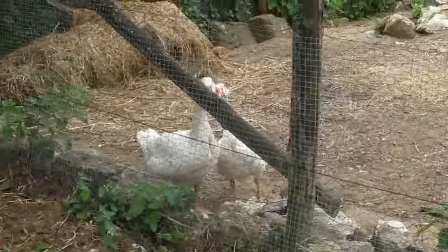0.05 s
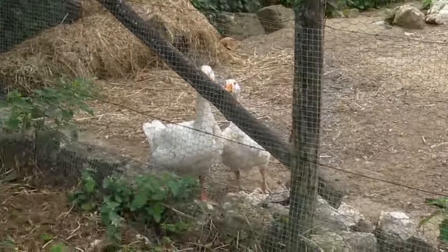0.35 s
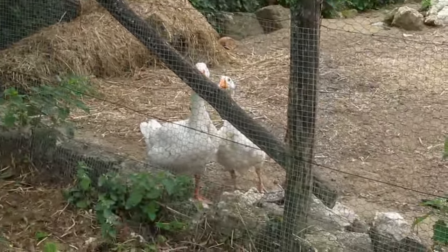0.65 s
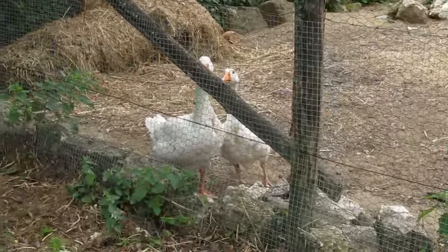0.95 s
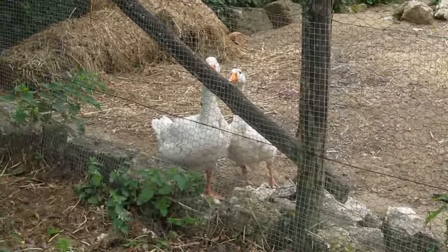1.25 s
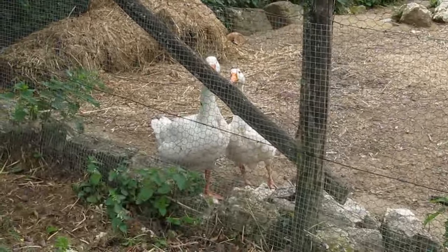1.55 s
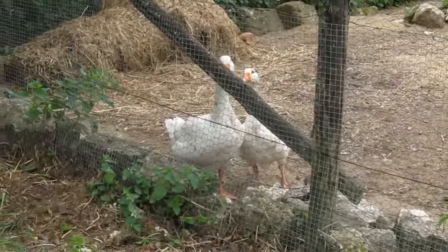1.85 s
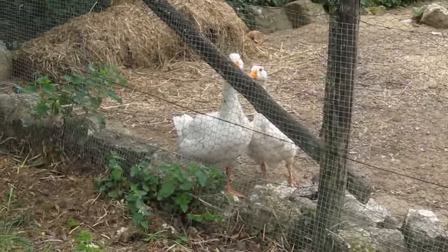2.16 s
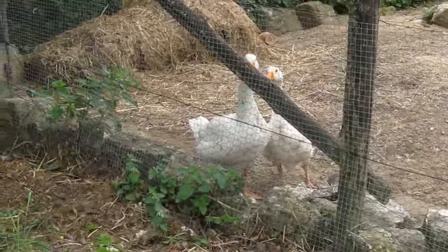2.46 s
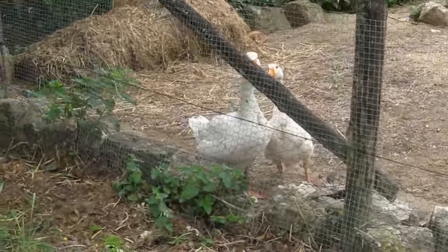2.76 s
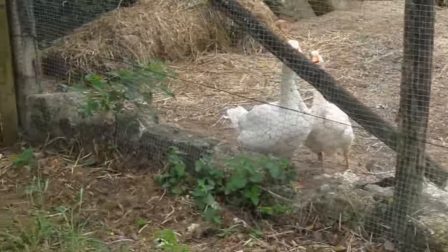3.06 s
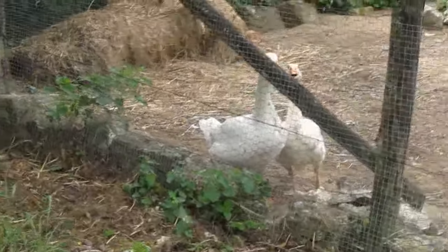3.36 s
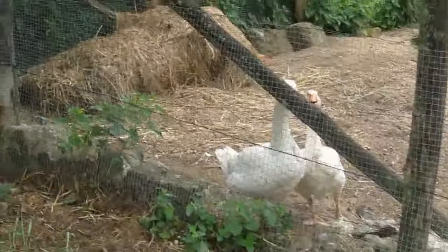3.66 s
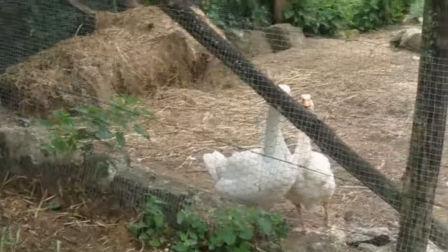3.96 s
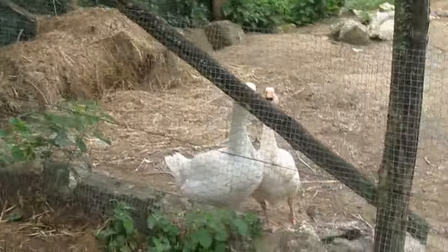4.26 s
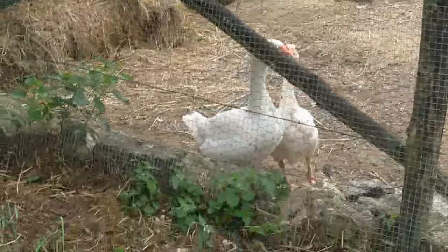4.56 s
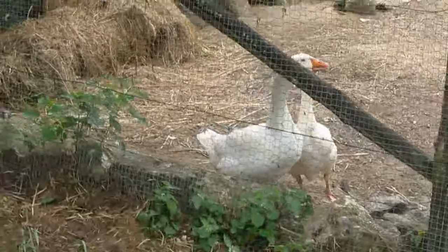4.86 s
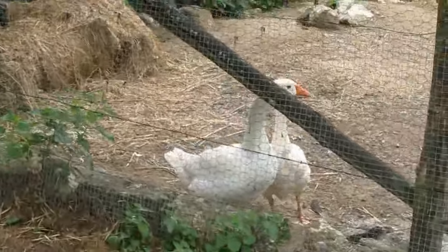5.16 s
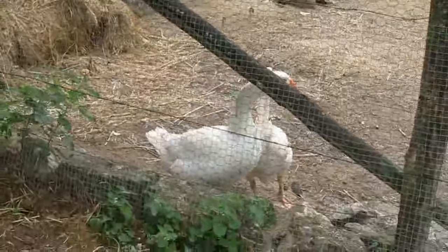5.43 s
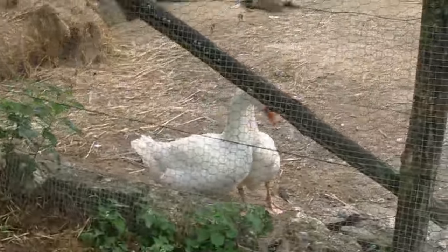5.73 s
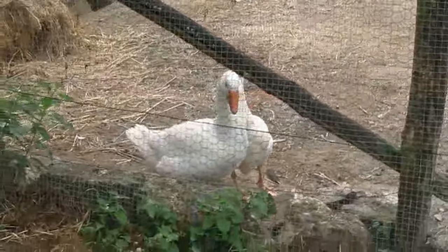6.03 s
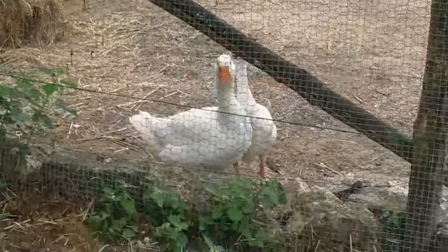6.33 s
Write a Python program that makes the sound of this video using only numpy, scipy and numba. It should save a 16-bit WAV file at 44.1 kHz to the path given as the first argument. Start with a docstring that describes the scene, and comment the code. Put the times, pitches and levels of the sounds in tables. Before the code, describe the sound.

Outdoors in a farm pen, two geese honk near the microphone, slightly to the right. One starts with a couple of calls and low grunts, pauses, then honks and yelps in quick succession, briefly overlapped by the other before the calls spread out. Each honk is short, nasal and rough-edged. Underneath are a light breeze in leaves, faint distant chirps and soft low microphone bumps.

```python
"""Two domestic geese call in quick runs in an open farm pen: one honks, grunts and yelps, one cuts in.
Each call is a train of syrinx pulses that starts as a rasp, locks into a nasal tone and ends in a creak.
It rings the long windpipe and bill and bounces off the ground, fence, stones and trees.
Leaves rustle, a small bird and poultry call far off, and soft thuds bump the microphone."""
import sys
import numpy as np
from scipy import signal
from scipy.fft import rfft, irfft, next_fast_len
from scipy.io import wavfile
from scipy.ndimage import uniform_filter1d
from numba import njit

SR = 44100
rng = np.random.default_rng(int(sys.argv[2]) if len(sys.argv) > 2 else 0)


def materialize(psi):
    """Save the field psi as 16-bit PCM at rate SR to the path in sys.argv[1].

    A 1-D psi becomes a single channel; in a 2-D psi each row is a channel.
    """
    bounded = np.clip(np.atleast_2d(psi).T, -1, 1)
    quanta = np.round(bounded * 32767).astype(np.int16)
    wavfile.write(sys.argv[1], SR, quanta)


N = 290619
TIME = np.arange(N) / SR


def undb(db):
    """Decibels to gain."""
    return 10 ** (np.asarray(db) / 20)


def unit(x):
    """Scale to rms 1."""
    return x / np.sqrt(np.mean(x ** 2) + 1e-18)


def add(track, start_s, x):
    """Mix x into the track at start_s."""
    i = int(start_s * SR)
    x = x[max(-i, 0):max(N - i, 0)]
    track[max(i, 0):max(i, 0) + len(x)] += x


def butter(x, hz, kind, order=2):
    """Low-pass or high-pass."""
    return signal.sosfilt(signal.butter(order, hz, kind, fs=SR, output="sos"), x)


def colour(x, gain_points, phase_points=((1, 0),)):
    """Filter by (Hz, dB) and (Hz, radians) points."""
    size = next_fast_len(N + SR)
    log_hz = np.log(np.maximum(np.fft.rfftfreq(size, 1 / SR), 1))
    curves = np.array(gain_points), np.array(phase_points)
    db, rad = (np.interp(log_hz, np.log(curve[:, 0]), curve[:, 1]) for curve in curves)
    return irfft(rfft(x, size) * undb(db) * np.exp(1j * rad), size)[..., :N]


def walk(t, rate_hz):
    """Random values joined by straight lines."""
    return np.interp((t - t[0]) * rate_hz, np.arange(512), rng.standard_normal(512))


@njit
def resonate(x, hz, width_hz):
    """State-variable band-pass with moving centre and width."""
    y = np.empty(len(x))
    band_state, low_state = 0., 0.
    for i in range(len(x)):
        g, damping = np.tan(np.pi * hz[i] / SR), width_hz[i] / hz[i]
        band = (band_state + g * (x[i] - low_state)) / (1 + g * (g + damping))
        band_state = 2 * band - band_state
        low_state += 2 * g * band
        y[i] = damping * band
    return y


def steady(x, sounding, window_s=0.011):
    """Hold the rms at 1 while sounding, then freeze the gain so the resonances ring out."""
    size = int(window_s * SR)
    power, weight = x[sounding] ** 2, np.ones(sounding.sum())
    for span in (size, size // 2):
        power = uniform_filter1d(power, span, mode="constant")
        weight = uniform_filter1d(weight, span, mode="constant")
    return x / np.sqrt(np.pad(power / weight, (0, len(x) - len(power)), "edge") + 1e-18)


def breeze(rumble_db=-4, side_db=-2, sway_db=1.3, flutter_db=.6):
    """Leaves rustle in the breeze over a low rumble common to both channels."""
    # Outdoor noise. Each row: frequency in Hz, relative density in dB.
    spectrum = [(18, -67), (30, -14.5), (119, -14.5), (200, -8), (524, -11.5), (581, 0.5), (1030, -13),
                (1440, -11.5), (1650, -7), (3230, -15), (3590, -18.5), (5880, -21.5), (15000, -43)]
    # Breeze strength. Each row: time in seconds, level in dB.
    strength = [(0, -47.5), (1, -50), (1.7, -44.5), (2.4, -43.5), (4.1, -45.5), (5.8, -50), (6.6, -49)]
    mid, side = colour(rng.standard_normal((2, N)), spectrum)
    leaves = unit(butter(mid + undb(side_db) * side * np.array([[1], [-1]]), 642, "highpass"))
    rumble = unit(butter(mid, 412, "lowpass")) * undb(rumble_db + sway_db * walk(TIME, 6.4))
    level_db = np.interp(TIME, *np.transpose(strength)) + flutter_db * walk(TIME, 9.9)
    return (leaves + rumble) * undb(level_db)


def bumps(low_hz=30, top_hz=170):
    """Low thuds of handling and air on the microphone."""
    # Each row: start in seconds, length in seconds, level in dB.
    thuds = [(1.45, 0.25, -48), (4.183, 0.29, -44), (4.63, 0.075, -44), (4.852, 0.37, -52),
             (5.837, 0.052, -47), (6.13, 0.053, -39.5)]
    swell = sum(undb(db) * np.exp(-(2 * (TIME - start_s) / length_s - 1) ** 2)
                for start_s, length_s, db in thuds)
    noise = butter(rng.standard_normal((2, N)), top_hz, "lowpass", order=4)
    return swell * unit(butter(noise, low_hz, "highpass"))


def far_birds(chirp_count=5, waver=.055):
    """Wavering sine glides: a small bird's whistles and chirps, and faint poultry."""
    # Each row: start and length in seconds, first and last pitch in Hz, relative level in dB.
    whistles = [(-.03, 0.12, 3877, 2980, -41.5), (-.01, 0.11, 3410, 2100, -46),
                (.45, 0.066, 3630, 2800, -49), (.97, .12, 2040, 3830, -49.5)]
    poultry = [(.7, 0.12, 790, 815, -55.5), (.9, 0.15, 733, 728, -61), (2.13, 0.16, 612, 573, -51),
               (3.85, .4, 1480, 1434, -55)]
    # One row: start, period and length in seconds, first and last pitch in Hz, relative level in dB.
    chirp_run = (.545, .072, .04, 3700, 2000, -57)
    first_s, period_s, *chirp = chirp_run
    chirps = [(first_s + k * period_s, *chirp) for k in range(chirp_count)]
    out = np.zeros(N)
    for start_s, length_s, from_hz, to_hz, db in [*whistles, *poultry, *chirps]:
        t = TIME[:int(length_s * SR)]
        hz = np.geomspace(from_hz, to_hz, len(t)) * (1 + waver * walk(t, 886))
        tone = np.sin(2 * np.pi * np.cumsum(hz) / SR)
        add(out, start_s, 2 * undb(db) * np.hanning(len(t)) * tone)
    return out


def pen_echoes(x, fence_t60_s=0.14, stones_t60_s=0.29, trees_t60_s=0.52):
    """Stereo tail: treble scatter off the wire fence, echoes off near stones, a dull wash from trees."""
    t = TIME[:SR // 2]
    fence, stones, trees = rng.standard_normal((3, 2, len(t)))
    tail = undb(-12) * unit(butter(fence, 3000, "highpass") * undb(-60 * t / fence_t60_s))
    tail += undb(-19) * unit(stones * undb(-60 * t / stones_t60_s))
    tail += undb(-26) * unit(butter(trees, 5000, "lowpass") * undb(-60 * t / trees_t60_s))
    return signal.fftconvolve(x[None], tail / np.sqrt(len(t)), axes=1)[:, :N]


def ground_bounce(t, pulses, delay_s, gain=0.33):
    """The ground returns each slap a moment later."""
    return pulses + gain * np.interp(t - delay_s, t, pulses, left=0)


def membrane(t, hz, rough, jitter=.08, scatter_db=2.0, hiss=0.14, puff_cycles=0.11):
    """One slap a cycle, then a puff of air; roughness scales the puff and the scatter in time and size."""
    cycles = np.cumsum(hz * np.exp(jitter * rough * walk(t, 170.15))) / SR
    at = np.interp(np.arange(int(cycles[-1])), cycles, np.arange(len(t)))  # fractional samples
    slaps = np.zeros(len(t) + 1)
    slaps[at.astype(int)] += 1 - at % 1
    slaps[at.astype(int) + 1] += at % 1
    puffs = np.exp(-(cycles % 1) / puff_cycles) * rng.standard_normal(SR)[:len(t)]
    return (slaps[:-1] + hiss * rough * puffs) * undb(scatter_db * rough * walk(t, 166.3))


def syrinx(t, hz, rough, high_register, join_s=0.016):
    """Two membranes beat, the second scaled by roughness; the high register triples the first's rate."""
    first = (1 - high_register) * membrane(t, hz, rough)
    first += high_register * (membrane(t, 3 * hz, rough) + membrane(t, 1.5 * hz, rough + .5) / 3)
    joined = np.clip((t - t[0]) / join_s, 0, 1)
    return first + 1.52 * rough * joined * membrane(t, 1.27 * hz, rough)


def rattle(t, pulses, scatter_db=3.5, slip_s=.00005):
    """No two slaps close alike: their edges vary in size and timing."""
    return np.interp(t + slip_s * walk(t, 174.5), t, pulses) * undb(scatter_db * walk(t, 170.5))


def neck_smear(x, direct=0.43, decay_s=0.004):
    """Short waves bounce in the long neck and spread each slap; the pattern shifts as the neck moves."""
    t = TIME[:SR // 400]
    echoes = rng.standard_normal((2, len(t))) * np.exp(-t / decay_s)
    early, late = (signal.lfilter(unit(echo) / np.sqrt(len(t)), 1, x) for echo in echoes)
    posture_rad = np.linspace(0, np.pi, len(x))
    return direct * x + np.cos(posture_rad) * early + np.sin(posture_rad) * late


def windpipe(pulses, tuning, damping, nasal_gain, chest_hz=165., chest_width_hz=60.):
    """Low band: slaps ring the windpipe and chest; modes from the third up are nasal."""
    # Each row: base centre in Hz, base width in Hz, relative gain in dB.
    modes = [(465.6, 43, -17), (677, 80.3, 3), (1006.3, 66.2, 4.5), (1243, 99, -1.5), (1695, 230, -7.5),
             (2103, 170, -13)]
    pipe = 0
    for k, (hz, width_hz, db) in enumerate(modes):
        gain = (-1) ** k * undb(db) * (nasal_gain if k > 1 else 1)
        pipe += gain * resonate(pulses, hz * tuning, width_hz * damping)
    chest = resonate(pulses, np.full(len(pulses), chest_hz), np.full(len(pulses), chest_width_hz))
    return butter(butter(pipe, 383, "highpass", order=4) + undb(-15.5) * chest, 2680, "lowpass")


def bill(edges, tuning, damping, sharpness):
    """High band: slap edges ring the bill; their sharpness feeds the modes from the fourth up."""
    # Each row: base centre in Hz, base width in Hz, relative gain in dB.
    modes = [(2450, 230, 2), (2930, 140, 3.5), (3302, 217, 1.5), (3950, 365, -4), (4400, 570, -9),
             (5390, 1660, -19.5), (8310, 580, -20.5), (10060, 9600, -32)]
    ring = 0
    for k, (hz, width_hz, db) in enumerate(modes):
        gain = (-1) ** k * undb(db) * (sharpness if k > 2 else 1)
        ring += gain * resonate(edges, hz * tuning, width_hz * damping)
    return butter(butter(ring, 13500, "lowpass"), 2780, "highpass", order=4)


def goose_call(start_s, length_s, rasp_s, top_hz, tone_rough, call_db, manner):
    """A rasp locks into a tone and slackens to a creak; pitch, level and treble follow air pressure."""
    # Each row, by manner: throat tuning ratio; first slap, rasp and late tone in dB against the call;
    # relative treble and nasal gain in dB.
    manners = {"contact": (1, -6, .5, -5, -6.5, 3.5), "hoot": (.98, -8, 1, -4.5, -9, -1),
               "honk": (1.06, -2, 1.5, -6, -10, 3.5), "swell": (1, -5.5, 3, -3.5, -11, 5),
               "grunt": (1.01, -17, -6, -6, -13, 1.5), "mutter": (1.12, 2, -1.5, -3, -5, -8),
               "yelp": (1.1, -4.5, -4, -8.5, -11, 2), "answer": (1.23, -8, -7, -4.5, -9, 3.5)}
    # Pulse rate as a share of top_hz at each of the six stages_s.
    pitch_arch = [.69, .89, 0.98, .99, .94, .72]
    tuning, first_db, rasp_db, late_db, bright_db, nasal_db = manners[manner]
    rasp_rough, creak_rough = 0.6556, 0.515
    locking_s, parting_s, release_s = 0.0119, 0.02, 0.027
    treble_per_db, usual_db = .5, -17.5  # louder calls are brighter

    t = start_s + np.arange(int((length_s + .04) * SR)) / SR
    lock_s, end_s = start_s + rasp_s, start_s + length_s
    peak_s, break_s = (lock_s + share * (end_s - lock_s) for share in (.18, .56))
    stages_s = np.sort([start_s, (start_s + lock_s) / 2, lock_s, peak_s, break_s, end_s])
    sounding = t < end_s
    arch = np.interp(t, stages_s, pitch_arch)
    hz = arch * top_hz
    locked = np.interp(t, [lock_s - locking_s, lock_s, break_s, break_s + parting_s], [0, 1, 1, 0])
    loose_rough = np.where(t < lock_s, rasp_rough, creak_rough)
    rough = np.clip(locked * tone_rough + (1 - locked) * loose_rough, 0, 1)

    # a hard-driven rasp squeals before it locks
    strain = np.interp(t, stages_s[:3], [0, 1, 0]) * undb(min(call_db + rasp_db + 12.0, 0))
    squeal = 0.92 * strain * membrane(t, 5 * hz, rough / 2)
    pulses = syrinx(t, hz, rough, high_register=locked * (manner == "yelp")) + squeal
    pulses = butter(pulses * sounding, 83, "highpass")
    pulses = ground_bounce(t, pulses, delay_s=0.001987 / tuning)

    # pressure opens the bill: resonances rise, nasal ones grow
    damping = 0.41 + rough
    low = windpipe(pulses, tuning * arch ** 0.1, damping, nasal_gain=undb(nasal_db - 2.5) * arch ** 1.7)
    sharpness = np.interp(t, stages_s, [.9, 1.1, 1, .85, .55, .5])
    high = bill(neck_smear(rattle(t, pulses)), arch ** 0.16, damping, sharpness)

    knots_s = np.sort([*stages_s[:4], end_s - release_s, end_s])
    level_db = call_db + np.interp(t, knots_s, [first_db, rasp_db, rasp_db / 2, 0, late_db, late_db - 5])
    bite_db = np.interp(t, [start_s, lock_s, end_s], [3.5, 0, -1])
    treble_db = bright_db + treble_per_db * (call_db - usual_db) + bite_db
    return undb(level_db) * (steady(low, sounding) + undb(treble_db) * steady(high, sounding))


def geese(gain_db=0.5):
    """Calls of both geese; the manner "answer" is the second bird."""
    # Each row: start, length and rasp length in seconds, top pulse rate in Hz, tone roughness 0-1,
    # relative level in dB, manner.
    calls = [(.074, 0.14, .046, 173.5, 0.36, -19.5, "contact"),
             (0.325, 0.11, .029, 167.9, 0.28, -18.5, "contact"),
             (1.133, 0.12, 0.049, 134.9, 0.25, -19.5, "grunt"),
             (1.296, 0.14, 0.04, 133.7, 0.39, -20, "grunt"),
             (1.45, 0.15, 0.046, 135.3, 0.28, -19.5, "grunt"),
             (1.784, 0.045, 0.011, 103.7, 0.42, -36.5, "mutter"),
             (1.841, 0.037, 0.0073, 94.6, .34, -37, "mutter"),
             (2.565, .12, 0.039, 166.6, 0.13, -17.5, "hoot"),
             (2.867, 0.15, 0.048, 174.2, 0.04, -16, "honk"),
             (3.111, 0.13, 0.054, 174.4, 0.15, -16.5, "honk"),
             (3.347, 0.12, 0.039, 171.6, 0.4, -16.5, "honk"), (3.6, 0.11, 0.033, 192.2, 0.37, -13, "yelp"),
             (4.251, 0.19, 0.062, 177.8, 0.12, -16, "honk"), (4.44, .18, .07, 172.2, .15, -18.5, "swell"),
             (4.666, 0.17, 0.052, 172.4, 0.34, -17.5, "swell"),
             (4.72, 0.2, 0.089, 162.4, .08, -19.5, "answer"),
             (4.879, .162, .066, 171.9, .34, -17.5, "swell"),
             (4.958, .131, 0.06, 156.3, 0.16, -22.5, "answer"), (5.11, .14, 0.06, 172.5, 0.48, -18, "honk"),
             (5.169, 0.11, .04, 140.2, 0.17, -28, "answer"),
             (5.337, 0.11, 0.047, 156.9, 0.67, -18.5, "honk"),
             (5.587, 0.094, 0.024, 176.7, 0.46, -17, "yelp"),
             (5.946, 0.12, 0.038, 176.3, 0.2, -18.5, "honk"),
             (6.196, 0.13, 0.049, 175.2, 0.17, -19, "honk"),
             (6.479, .121, 0.029, 163.8, 0.34, -19.5, "honk")]
    out = np.zeros(N)
    for call in calls:
        add(out, call[0], goose_call(*call))
    return undb(gain_db) * out


def scene():
    """Birds, breeze and bumps; above the bass, calls are louder on the right and lag on the left."""
    # Each row: frequency in Hz, left minus right in dB.
    pan = [(150, -.6), (700, -.5), (1100, -4.7), (2500, -5.6), (10000, -6)]
    # Phase between the microphone ports. Each row: frequency in Hz, left lead in radians.
    port_phase = [(250, 0.14), (700, -0.46), (1100, -0.61), (1700, -0.22), (2500, -0.58), (4800, -0.54),
                  (10000, -1.4)]
    calls = geese() + far_birds()
    left, right = calls + pen_echoes(calls)
    hz, pan_db = np.transpose(pan)
    left = colour(left, np.c_[hz, pan_db / 2], port_phase)
    right = colour(right, np.c_[hz, -pan_db / 2])
    return np.array([left, right]) + breeze() + bumps()


def record(dry, ceiling=1.3, top_hz=15300):
    """Soft-clip the peaks and cut the top."""
    rounded = ceiling * np.tanh(dry / ceiling)
    return signal.sosfilt(signal.ellip(8, .2, 70, top_hz, fs=SR, output="sos"), rounded)


dry = scene()
out = record(dry)
materialize(out)
```